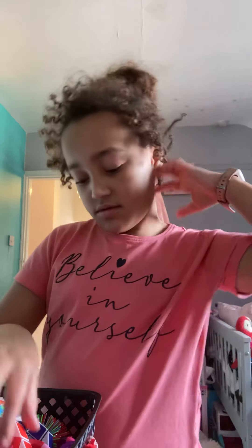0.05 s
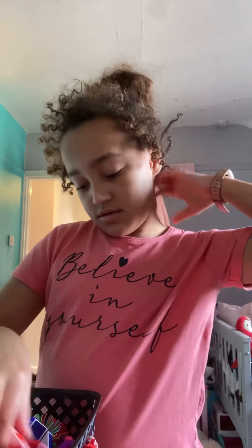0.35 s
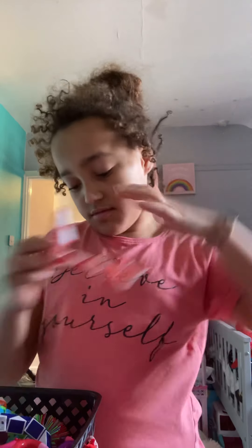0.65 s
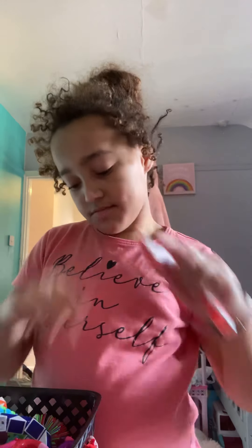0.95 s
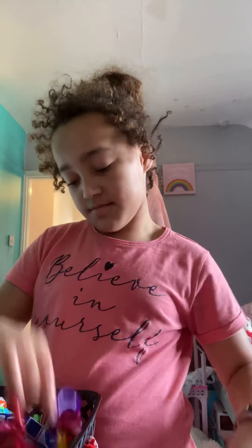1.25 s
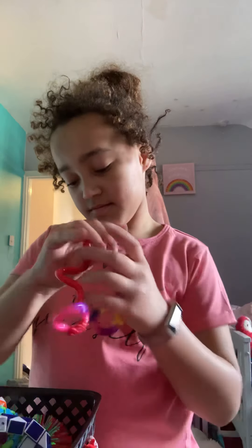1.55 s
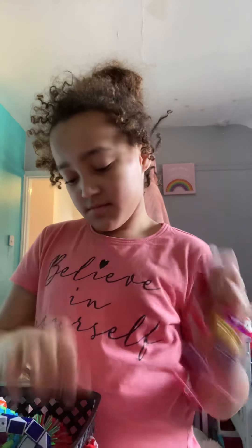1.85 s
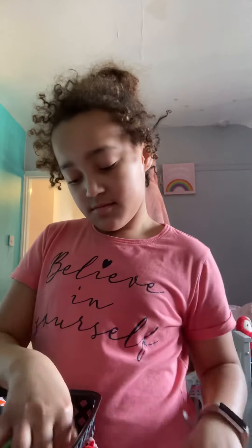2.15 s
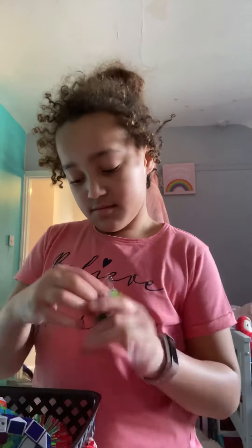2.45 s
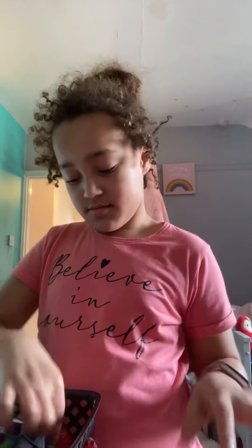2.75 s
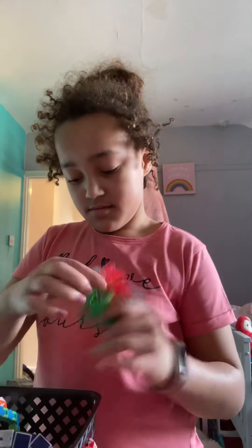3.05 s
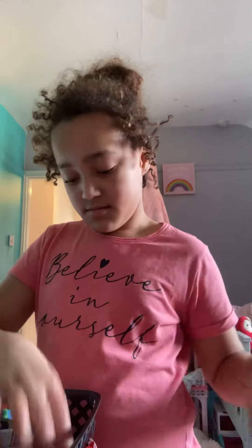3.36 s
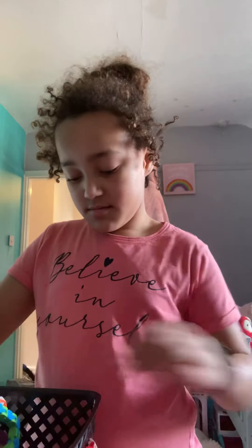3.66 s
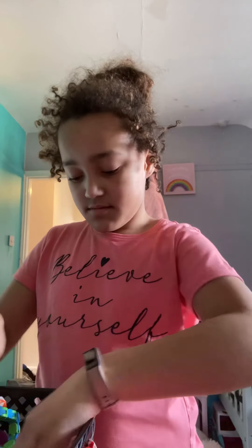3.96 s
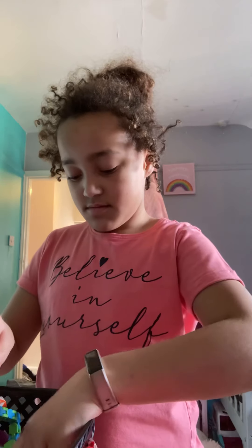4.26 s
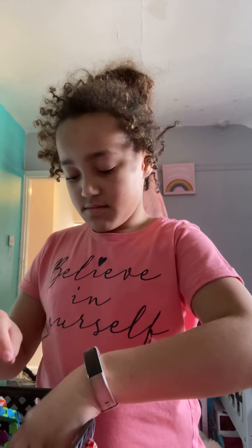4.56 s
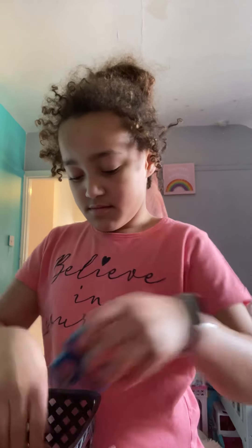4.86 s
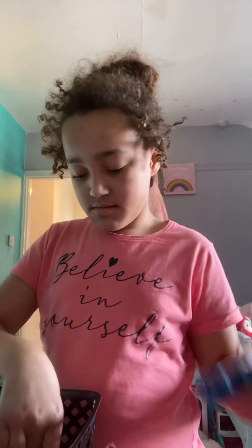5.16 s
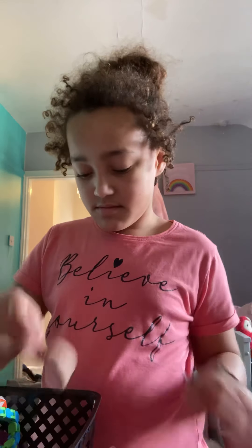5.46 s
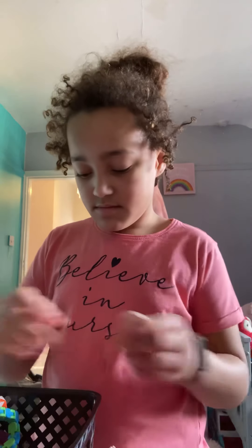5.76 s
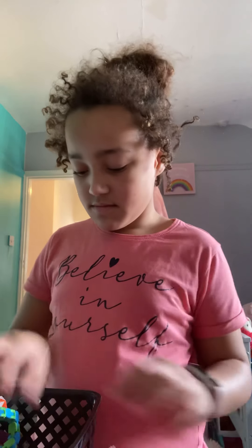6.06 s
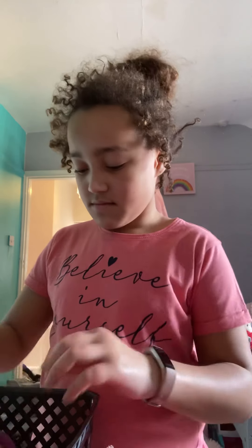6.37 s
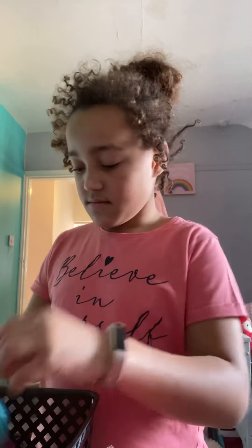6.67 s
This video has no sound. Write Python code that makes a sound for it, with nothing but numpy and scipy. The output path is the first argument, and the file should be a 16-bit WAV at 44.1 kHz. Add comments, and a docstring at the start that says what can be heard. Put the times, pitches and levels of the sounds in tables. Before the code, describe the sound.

A hand sorts small hard toys in a plastic basket, close by, in a small bedroom with a short decay and a faint, low appliance hum. Light clicks, scrapes and finger rustles fill the first second. At about 1.1 seconds a tossed toy lands with a loud, hollow clatter and a thump. After a few soft clicks, another bounces at 2 seconds. A lighter landing comes near 2.8 seconds with a tiny, very high ring. From about 3.3 to 4.4 seconds the rummaging grows busy: plastic scrapes, toys click and bump together, and the loaded basket rumbles. It eases to faint rustling until a toy clatters down loudly at 5.4 seconds, followed by one sharp landing at 5.9. From 6 seconds to about 6.7 the hand digs in the basket again, with more clicks, scrapes and hollow bumps.

```python
"""A small bedroom, with quiet air and the faint hum of an appliance. A hand rummages in a plastic
basket of small hard toys: plastic sticks and slips in scrapes and rustle, the loaded basket rumbles,
and the toys bump and click together, a tiny part ringing very high. Toys are picked out, turned in
the fingers and tossed aside, where they bounce and clatter: each landing rings a hollow shell and
thumps the surface under it. The room answers with a short decay."""
import sys
import numpy as np
from scipy import signal
from scipy.fft import rfft, irfft, next_fast_len
from scipy.io import wavfile
from scipy.ndimage import uniform_filter1d, map_coordinates

SR = 44100
rng = np.random.default_rng(int(sys.argv[2]) if len(sys.argv) > 2 else 0)


def store_pcm(level_fs):
    """Save levels as 16-bit WAV."""
    pcm = np.round(np.clip(level_fs, -1, 1) * 32767).astype(np.int16)
    wavfile.write(sys.argv[1], SR, np.atleast_2d(pcm).T)


N = 296793
TOP_HZ = 16100
BLOW_T = np.arange(SR // 6) / SR  # time axis of one blow, in seconds


def amp(db):
    return 10 ** (np.asarray(db) / 20)


def unit_rms(x):
    return x / np.sqrt(np.mean(x ** 2) + 1e-20)


def along(points, hz):
    """Read a curve of (Hz, value) points on a log frequency axis."""
    points_hz, values = np.transpose(points)
    return np.interp(np.log(hz + 1), np.log(points_hz), values)


def filtered(x, response):
    """Equalise x with a gain that is a function of frequency."""
    size = next_fast_len(N + SR // 2)
    return irfft(rfft(x, size) * response(np.fft.rfftfreq(size, 1 / SR)), size)[:N]


def coloured(x, spectrum):
    """Shape x with an EQ curve, at rms 1."""
    return unit_rms(filtered(x, lambda hz: amp(along(spectrum, hz))))


def wobble(rate):
    """A smooth random curve, rate knots a second."""
    return map_coordinates(rng.standard_normal(N // 50), [np.arange(N) * rate / SR], mode="wrap")


def add(track, start_s, sound):
    """Mix a sound into the track."""
    start = round(start_s * SR)
    track[start:start + len(sound)] += sound[:N - start]


def bandpass(x, low_hz, high_hz):
    return signal.sosfilt(signal.butter(3, [low_hz, high_hz], "band", fs=SR, output="sos"), x)


# room tone EQ: freq_hz, gain_db
AIR_EQ = [(33, -30.5), (48, -14.5), (66, -2), (100, -9), (150, -6.5), (215, -2), (300, -13), (500, -17),
          (1000, -22), (2000, -28), (7000, -28), (9500, -34.5), (15000, -36)]
# partials of the appliance hum: pitch_hz, level_db
HUM_PARTIALS = [(74.5, -56), (225, -57.5), (297, -72.5)]
def background():
    """Quiet room air and the slightly unsteady hum of a household appliance."""
    t, hum = np.arange(N) / SR, np.zeros(N)
    for hz, db in HUM_PARTIALS:
        drift_db, drift_phase = .4 * wobble(3), .4 * wobble(3)
        hum += amp(db + drift_db) * np.sqrt(2) * np.sin(2 * np.pi * hz * t + drift_phase)
    return amp(-4.5) * hum + amp(-59) * coloured(rng.standard_normal(N), AIR_EQ)


# bedroom reverb time: freq_hz, t60_s
ROOM_DECAY = [(120, 0.3), (500, .3), (2000, 0.23), (6000, 0.18), (14000, 0.13)]
def bedroom(sound, build_s):
    """The room's answer: a diffuse tail that builds up quickly and loses its treble first."""
    hz, t, noise = signal.stft(rng.standard_normal(SR // 4), SR, nperseg=256)
    tail = signal.istft(noise * amp(-60 * t / along(ROOM_DECAY, hz)[:, None]), SR, nperseg=256)[1]
    tail *= 1 - np.exp(-(np.arange(len(tail)) / SR / build_s) ** 2)
    return signal.fftconvolve(sound, tail / np.linalg.norm(tail))


def in_room(sound, wet_db, build_s):
    """The direct sound plus the bedroom's answer."""
    heard = amp(wet_db) * bedroom(sound, build_s)
    add(heard, 0, sound)
    return heard


def stroke_power(rows):
    """Each stroke of the hand takes hold, eases off as the toys give way, and dies away."""
    attack_s, sag_db, release_db_per_s = 0.0136, 3, 332.5
    power = np.zeros(N)
    for start_s, length_s, db in rows:
        t = np.arange(N) / SR - start_s
        sag = sag_db * (np.clip(t / length_s, 0, 1) - .5)
        release = release_db_per_s * np.clip(t - length_s, 0, 1)
        power += (np.clip(t / attack_s, 0, 1) * amp(db - sag - release)) ** 2
    return power


def slips(per_s, spread_db, smooth_share):
    """Tiny stick-slip catches of uneven size over smooth friction."""
    caught = rng.random(N) < per_s / SR
    sizes = amp(spread_db * np.clip(rng.standard_normal(N), -2, 2))
    catches = caught * sizes * rng.choice([-1, 1], N)
    return unit_rms(catches) + smooth_share * rng.standard_normal(N)


def wandering(x, depth_db):
    """The contact point wanders from toy to toy, so ever new resonances stand out."""
    spectra = signal.stft(x, nperseg=256)[2]
    peaks = rng.standard_normal(spectra.shape)
    for axis, size in [(0, 4), (0, 3), (1, 6), (1, 4)]:  # smooth over frequency, then time
        peaks = uniform_filter1d(peaks, size, axis)
    return unit_rms(signal.istft(spectra * amp(depth_db * unit_rms(peaks)), nperseg=256)[1][:N])


def jostle(per_s, spread_db, centre_hz, cycles):
    """Countless light touches of loose pieces, each with its own pitch, at rms 1."""
    out, t = np.zeros(N), np.arange(SR // 50) / SR
    for when, size, pitch in rng.random((int(per_s * N / SR), 3)):
        hz = centre_hz * 4 ** (pitch - .5)
        ping = amp(-60 * t * hz / cycles) * np.sin(2 * np.pi * hz * t)
        snap = amp(-60 * t / 0.0049) * rng.standard_normal(len(t))
        add(out, when * (N - 1) / SR, amp(spread_db * size) * (ping + snap))
    return unit_rms(out)


# EQs of the basket's rumble, the plastic-on-plastic scrape and the fine rustle: freq_hz, gain_db
RUMBLE_EQ = [(40, -19), (100, -6), (170, -1.5), (330, -4), (470, -6.5), (650, -8.5), (1000, -20.5),
             (1800, -51)]
SCRAPE_EQ = [(400, -28), (900, -2), (1500, 2), (2400, 0.5), (3000, -2.5), (4000, -2.5), (5500, -6),
             (7800, -16), (10000, -29.5), (16000, -49)]
RUSTLE_EQ = [(4000, -30.5), (7000, -2.5), (8500, -6.5), (12000, -3.5), (15500, -9), (17000, -8)]
# the hand shoves toys through the basket: start_s, length_s, scrape_db, rumble_over_scrape_db
HAND_SHOVES = [(0, 0.0088, -44, -1), (0.26, 0.11, -52.5, -12), (0.37, 0.086, -48.5, 1.5),
               (1.111, 0.035, -43, -7), (2.201, 0.031, -54, 7), (2.84, .13, -53, 0),
               (3.339, 0.089, -40, -5.5), (3.518, 0.13, -50, -8.5), (3.695, 0.095, -40.5, -3.5),
               (3.861, 0.083, -42, 5.5), (4.038, .15, -46.5, 0.5), (4.201, 0.091, -50.5, 0),
               (4.308, 0.22, -61, 2), (4.406, 0.016, -36.5, -5), (4.557, .52, -64.5, -2),
               (4.915, 0.086, -57.5, 3.5), (6.039, 0.023, -42.5, 0), (6.201, 0.056, -40.5, -1),
               (6.313, 0.074, -46.5, 1), (6.445, 0.099, -52.5, 9), (6.658, 0.083, -45, -8.5)]
# fingers brush over a toy: start_s, length_s, rustle_db
FINGER_BRUSHES = [(.07, .05, -66), (.53, 0.082, -70), (.715, .025, -48), (.76, 0.1, -59),
                  (1.01, 0.19, -62.5), (1.48, 0.14, -62.5), (2.225, 0.055, -51.5), (2.465, 0.051, -54),
                  (2.64, .03, -60.5), (3.03, 0.034, -62), (4.61, 0.089, -58.5), (5.19, 0.052, -68.5),
                  (6.21, .03, -38.5), (6.33, 0.075, -49)]
def rummage():
    """Sliding toys scrape and jostle, and the loaded basket rumbles; brushing fingers mostly rustle."""
    shove = stroke_power([(s, length, db) for s, length, db, _ in HAND_SHOVES])
    load = stroke_power([(s, length, db + over_db) for s, length, db, over_db in HAND_SHOVES])
    brush = stroke_power(FINGER_BRUSHES)
    grip = amp(3 * wobble(70))
    friction = wandering(grip * slips(per_s=930, spread_db=3.5, smooth_share=1), depth_db=5)
    pieces = jostle(per_s=110, spread_db=16, centre_hz=3000, cycles=28)
    rumble = np.sqrt(load) * coloured(slips(per_s=220, spread_db=-2.5, smooth_share=0.58), RUMBLE_EQ)
    scrape = coloured(friction, SCRAPE_EQ) + amp(-7) * coloured(pieces, SCRAPE_EQ)
    scrape *= np.sqrt(shove + amp(-5.5) ** 2 * brush)
    rustle = coloured(friction, RUSTLE_EQ) + amp(-0.5) * coloured(pieces, RUSTLE_EQ)
    rustle *= np.sqrt(brush + amp(-13) ** 2 * shove)
    return in_room(amp(-0.5) * (rumble + scrape + rustle), wet_db=-14.5, build_s=0.00087)[:N]


# a toy nudges the basket or another toy, a hollow bump or short chirr: time_s, pitch_hz, level_db
SOFT_BUMPS = [(0.376, 370, -39.5), (0.44, 380, -35.5), (1.378, 350, -40.5), (1.446, 323, -38),
              (2.307, 3030, -42.5), (2.421, 2810, -38), (2.775, 137, -27), (3.431, 256, -38),
              (3.735, 430, -31), (3.765, 178, -31.5), (3.917, 370, -30.5), (4.756, 150, -39),
              (6.466, 331.3, -27)]
def bumps():
    """Soft, sticky contacts swell and wake little but one resonance."""
    out, swell_s, lead_s = np.zeros(N), .007, .004
    push = BLOW_T / swell_s * np.exp(1 - BLOW_T / swell_s)
    for time_s, hz, db in SOFT_BUMPS:
        note = bandpass(rng.standard_normal(len(push)) * push, hz / 1.2, hz * 1.2)
        add(out, time_s - lead_s, amp(db + 1) * note / np.abs(note).max())
    return in_room(out, wet_db=-21.5, build_s=0.0063)[:N]


def ring(modes, detune, damping):
    """Struck modes, varying in strength and pitch at each blow; damping divides their decay times."""
    hz, db, t60 = np.transpose(modes)[:, :, None]
    size, shift, phase = rng.standard_normal((3, len(modes), 1))
    waves = np.sin(2 * np.pi * (hz * (1 + detune * shift) * BLOW_T + phase))
    decays = amp(db + 2 * size - 60 * BLOW_T * damping / t60)
    return np.sum(decays * waves, axis=0) / np.sqrt(len(modes))


def crack(snap_t60_s, buzz_db, buzz_t60_s):
    """The snap of a hard contact, then the dense, quickly damped ring of thin plastic."""
    envelope = amp(-60 * BLOW_T / snap_t60_s) + amp(buzz_db - 60 * BLOW_T / buzz_t60_s)
    return rng.standard_normal(len(BLOW_T)) * envelope


# modes of a tiny hard part: pitch_hz, level_db, base_t60_s
TINY_PART_MODES = [(14030, -8, 0.14), (14200, 6, 0.26), (14190, 3, 0.16), (14300, 3, 0.1)]
# hits on that part: start_s, level_db
TINK_HITS = [(2.474, -33), (2.483, -41), (2.502, -48), (2.7648, -36), (2.776, -19), (2.801, -35)]
def tinks():
    """A thin, very high ring and buzz from a tiny hard part of one toy."""
    out = np.zeros(N)
    for start_s, db in TINK_HITS:
        buzz = bandpass(crack(snap_t60_s=.02, buzz_db=-8, buzz_t60_s=.12), 13200, 15200)
        tone = ring(TINY_PART_MODES, detune=.012, damping=2.2)
        add(out, start_s, amp(db) * (amp(-4) * tone + amp(6) * buzz))
    return out


def plastic_wall(hz, cycles, partials_db):
    """A thin wall: one main mode in a crowd of others, each falling 60 dB in the given cycles."""
    modes = hz * np.exp(np.append(0, rng.uniform(-1, 1, size=8)))[:, None]
    sizes = np.append(1, amp(partials_db) * rng.standard_normal(size=8))[:, None] * (modes < TOP_HZ)
    decays = amp(-60 * BLOW_T * modes / cycles)
    return np.sum(sizes * decays * np.sin(2 * np.pi * modes * BLOW_T), axis=0)


def contact(rise_s):
    """The force of a blow builds up as the edges meet."""
    return 1 - np.exp(-BLOW_T / rise_s)


def band_levels(colour, db, brightness_db):
    """A harder contact tilts the sound towards its upper bands."""
    return [db + offset_db + share * brightness_db for offset_db, share in colour]


def voiced(sound, edges_hz, levels_db):
    """Set the attack level of each band of a blow; the slow lowest band gets a longer window."""
    out = np.zeros(len(sound))
    for k, db in enumerate(levels_db):
        band = bandpass(sound, edges_hz[k], edges_hz[k + 1])
        attack = round(SR * (.004 if k else .016))
        out += amp(db) * band / np.sqrt(np.mean(band[:attack] ** 2))
    return out


# modes of the loaded basket: pitch_hz, level_db, base_t60_s
BASKET_MODES = [(272, -0.5, 0.031), (344.2, -1, 0.13), (445, 4, 0.034), (525.3, -7.5, 0.18), (791, -4, .04)]
# borders of the knock, clack, click and tick bands: edge_hz
CLICK_BAND_EDGES = [180, 1000, 4000, 9000, 18000]
# balance of those four bands: offset_db, brightness_share
CLICK_BALANCE = [(-15.5, -2), (-7, -1.4), (0.5, 0.5), (-7.5, 1.51)]
# toys touch each other and the basket: start_s, pitch_hz, level_db, brightness_db
TOY_CLICKS = [(0.275, 3780, -38, -3.5), (0.3853, 5170, -41.5, 5.5), (0.42, 2040, -38, -3.5),
              (0.4752, 4250, -30.5, -3), (0.4917, 5360, -39.5, 6), (0.7234, 2980, -40, 0.5),
              (1.1062, 2540, -44.5, -3), (1.2844, 11840, -54, 16.5), (1.339, 9100, -49, 1.5),
              (1.427, 5360, -43.5, -1.5), (1.4965, 7370, -43, 1.5), (1.5054, 6060, -42, 5),
              (1.5153, 4970, -44, 3), (1.5582, 5140, -45, 2.5), (1.7471, 5580, -37.5, 6),
              (2.0893, 4590, -32, -3), (2.306, 8260, -43, 3), (2.4209, 2860, -49, -2),
              (2.455, 2800, -46, 2.5), (2.4734, 8130, -47.5, 5), (2.502, 8000, -52, 11),
              (2.753, 11200, -30, 4), (2.7684, 8300, -28, -1), (2.892, 9300, -42.5, 5),
              (2.9269, 5130, -42.5, 6), (2.9381, 5320, -32, 3.5), (2.991, 1870, -39.5, -2),
              (3.4299, 2126, -42, -4.5), (3.5052, 3900, -41, 0.5), (3.5856, 7830, -35, 5),
              (3.6012, 7350, -32, 3.5), (3.6223, 7880, -26, 6), (3.7294, 5330, -19, -0.5),
              (3.755, 2320, -34, -6.5), (3.783, 9300, -33, 1), (3.8537, 2390, -27.5, -5.5),
              (3.9113, 2170, -32.5, -9.5), (3.9269, 4800, -32, -0.5), (3.9803, 7450, -39.5, -3.5),
              (4.0088, 3480, -31, -5.5), (4.0519, 4270, -32, 1), (4.0592, 4000, -29.5, 3),
              (4.1025, 3930, -35.5, -3), (4.1342, 3340, -32, -4), (4.171, 4900, -32.5, 0),
              (4.215, 8100, -45.5, 6.5), (4.5408, 11400, -45.5, 1.5), (4.8665, 4260, -45.5, -2.5),
              (4.9739, 6900, -48.5, 1), (6.0518, 4680, -29, 1), (6.0684, 6840, -40, 2),
              (6.2002, 8400, -27.5, 4.5), (6.2196, 4800, -33, -4.5), (6.2568, 5600, -39.5, -9),
              (6.3144, 3750, -34.5, 0.5), (6.3404, 7500, -36.5, 0.5), (6.4626, 7800, -34.5, -2.5),
              (6.4747, 3720, -31, -2.5), (6.6642, 3520, -42, 2.5), (6.6823, 8600, -36, 3.5),
              (6.7097, 12000, -34, 3.5)]
def clicks():
    """Light, dry contacts between toys; the basket knocks along, most under the dull, heavy ones."""
    out = np.zeros(N)
    for start_s, hz, db, brightness_db in TOY_CLICKS:
        touch = crack(snap_t60_s=0.0022, buzz_db=-23, buzz_t60_s=0.03)
        touch += amp(-11) * plastic_wall(hz, cycles=32, partials_db=-7)
        knock = amp(-14.5) * ring(BASKET_MODES, detune=0.055, damping=0.98)
        levels_db = band_levels(CLICK_BALANCE, db, brightness_db)
        blow = voiced(touch * contact(rise_s=0.001) + knock, CLICK_BAND_EDGES, levels_db)
        add(out, start_s, in_room(blow, wet_db=-11.5, build_s=0.0018))
    return out


# modes of the hollow toy shells and of the surface they land on: pitch_hz, level_db, base_t60_s
SHELL_MODES = [(813, -7, .06), (1050, -8, .06), (1240, -8, .05), (1580, 1, .06), (1750, 1, .05),
               (2050, 1, .05), (2220, -3, .04), (2760, 1, .05), (3010, -3, .04), (3700, -1, .04),
               (5950, 0, .035)]
SURFACE_MODES = [(64.6, -9, 0.5), (102.6, -6, 0.33), (145, 1, 0.24), (181, 9, 0.12), (234, -10, .15),
                 (281.2, 3, 0.18), (330.8, -7.5, 0.31), (406, -8, 0.064), (482, -8, 0.12)]
# borders of the thud, knock, clack, click and tick bands: edge_hz
LANDING_BAND_EDGES = [45, 500, 1300, 4000, 9000, 18000]
def landing(hz, levels_db):
    """A landing rings the toy's shell and thumps the surface under it."""
    shell = crack(snap_t60_s=0.01, buzz_db=-11, buzz_t60_s=.05)
    shell += amp(-10) * ring(SHELL_MODES, detune=.008, damping=1)
    shell += amp(-8) * plastic_wall(hz, cycles=55, partials_db=-6)
    thud = amp(-4.5) * ring(SURFACE_MODES, detune=0.019, damping=1.7) * contact(rise_s=0.0015)
    return voiced(shell * contact(rise_s=.001) + thud, LANDING_BAND_EDGES, levels_db)


# balance of the four bands above the thud: offset_db, brightness_share
LANDING_BALANCE = [(-9.5, -0.81), (0, -0.54), (-2.5, 0.69), (-13, 2.5)]
# tossed toys land and bounce: start_s, pitch_hz, level_db, brightness_db, thud_db
TOY_BOUNCES = [(1.139, 1680, -14, -1.5, -24), (1.1437, 2072, -14.5, -7.5, -30),
               (1.1627, 2820, -16, -1.5, -40.5), (1.17, 2560, -16, 2, -33), (1.1775, 2950, -24.5, 0, -38.5),
               (1.9706, 6640, -13, 1, -28.5), (1.9798, 3800, -17, -3, -36),
               (1.9911, 2530, -14.5, 1.5, -42.5), (2.002, 3615, -13.5, 3.5, -43),
               (2.016, 2760, -15, 1, -32), (2.043, 2785, -22.5, -5.5, -31.5), (2.054, 2800, -21.5, -1, -47),
               (2.1123, 2170, -34.5, -3.5, -43), (2.1263, 2750, -31, -5.5, -44),
               (2.7457, 2720, -28, -7, -28.5), (2.7623, 8400, -28, 8, -56), (2.7729, 5370, -26.5, 6.5, -34),
               (2.777, 5370, -37.5, -18, -36.5), (2.7998, 10100, -30, 7, -47),
               (2.832, 1220, -42, -13.5, -48), (5.3908, 2112, -12, -1, -23.5),
               (5.4114, 2750, -17, 4.5, -29), (5.4138, 1817, -15, -3.5, -38.5),
               (5.9221, 5940, -17.5, 1.5, -25)]
def tossed_toys():
    """A tumbling toy radiates differently each way: to the listener, the walls and the ceiling."""
    out = np.zeros(N)
    for start_s, hz, db, brightness_db, thud_db in TOY_BOUNCES:
        levels_db = [thud_db] + band_levels(LANDING_BALANCE, db, brightness_db)
        direct, walls, ceiling = (landing(hz, levels_db) for _ in range(3))
        reflections = bedroom(walls, build_s=0.0014) + bedroom(ceiling, build_s=0.0043)
        add(out, start_s, direct)
        add(out, start_s, amp(-12.5) * reflections)
    return out


def scene():
    """The mono mix: clatter in front, rummaging under it, room tone behind."""
    return (tossed_toys() + clicks() + bumps() + tinks() + rummage() + background())[None]


def record(dry):
    """The microphone rounds off the highest peaks and cuts steeply above its band limit."""
    peak_limit = .95
    rounded = dry[0] / (1 + np.abs(dry[0] / peak_limit) ** 6) ** (1 / 6)
    return filtered(rounded, lambda hz: 1 / (1 + (hz / TOP_HZ) ** 120))[None]


dry = scene()
out = record(dry)
store_pcm(out)
```